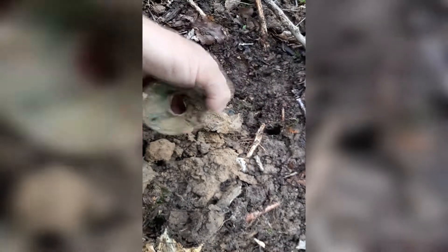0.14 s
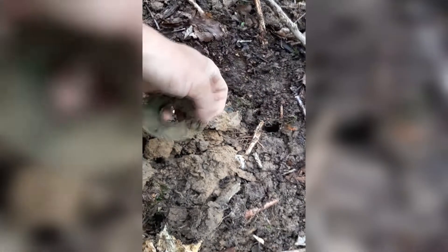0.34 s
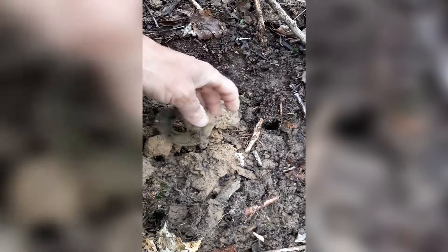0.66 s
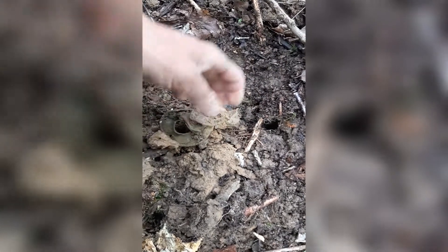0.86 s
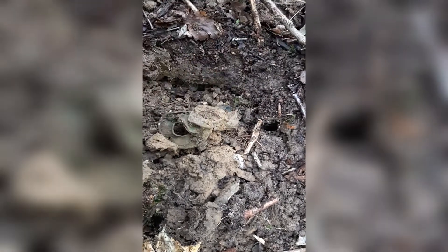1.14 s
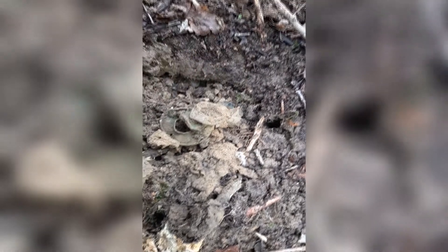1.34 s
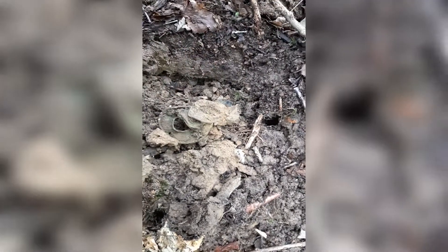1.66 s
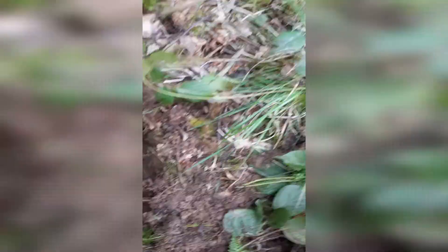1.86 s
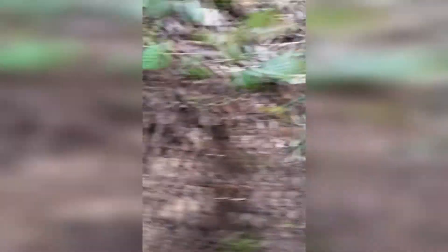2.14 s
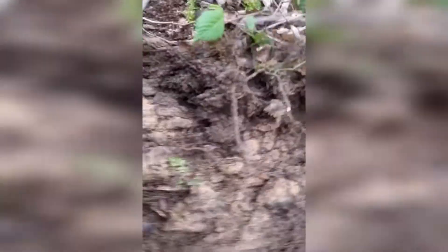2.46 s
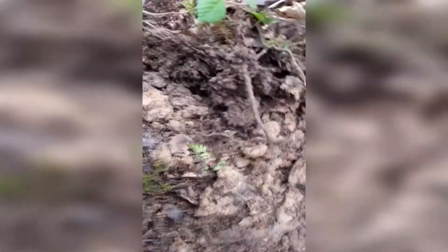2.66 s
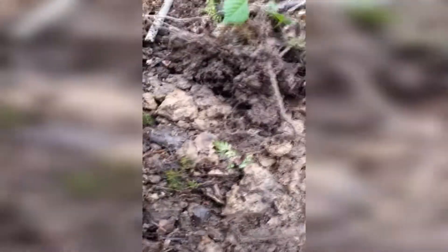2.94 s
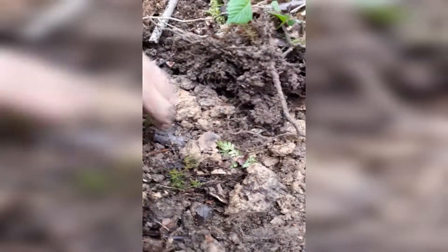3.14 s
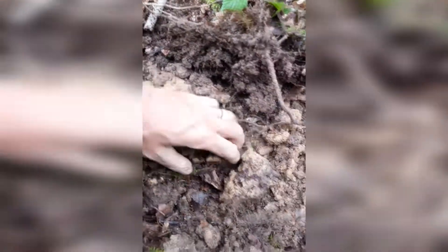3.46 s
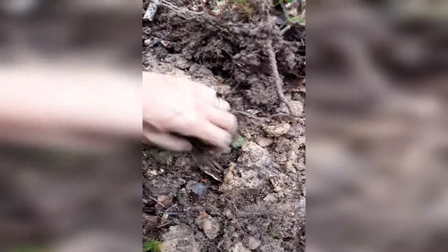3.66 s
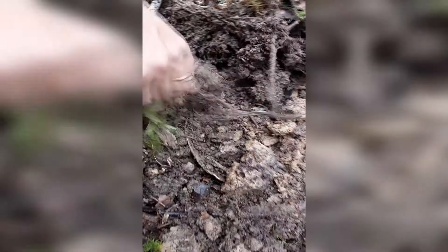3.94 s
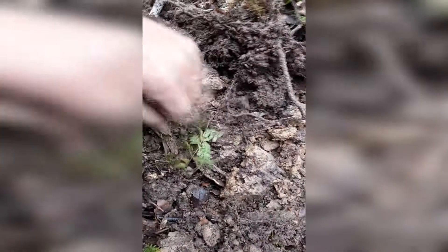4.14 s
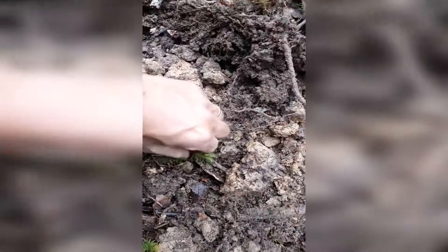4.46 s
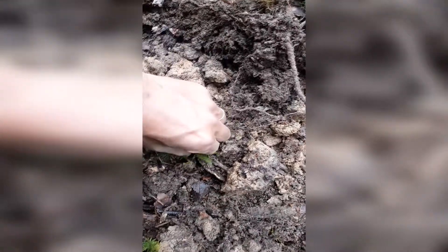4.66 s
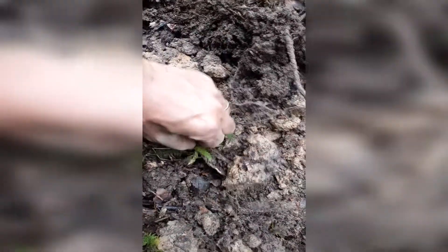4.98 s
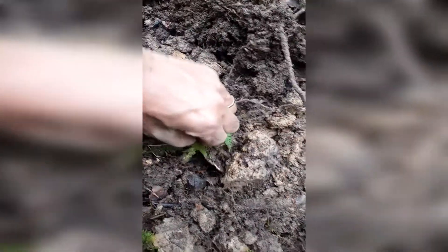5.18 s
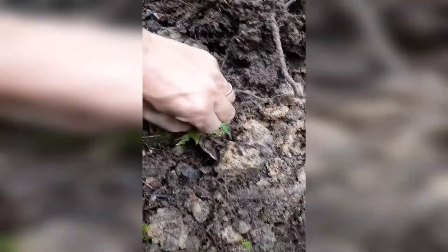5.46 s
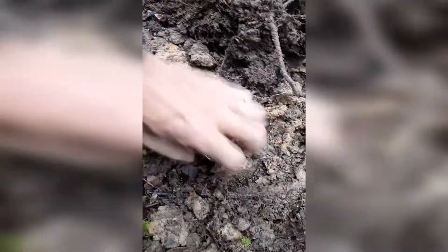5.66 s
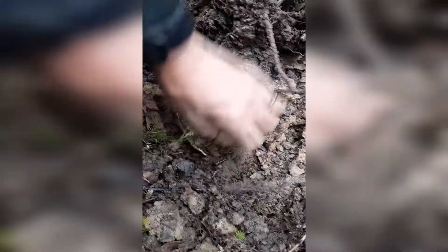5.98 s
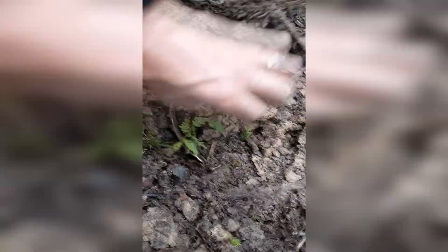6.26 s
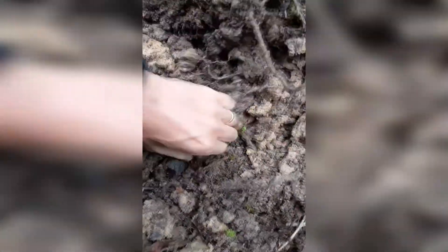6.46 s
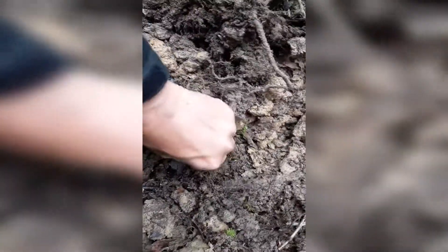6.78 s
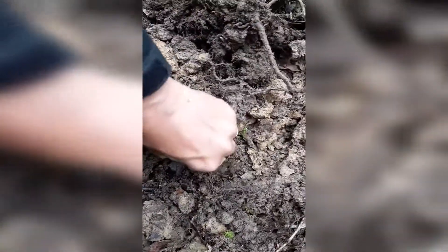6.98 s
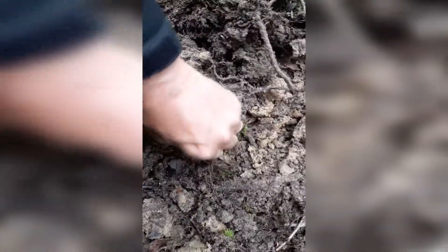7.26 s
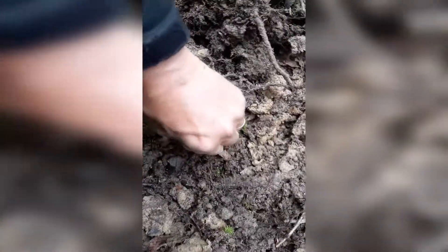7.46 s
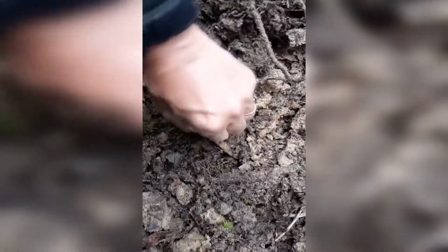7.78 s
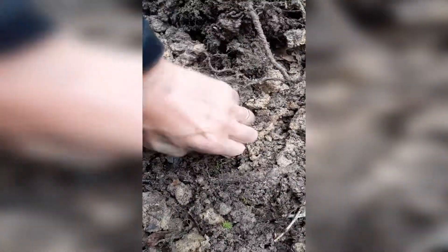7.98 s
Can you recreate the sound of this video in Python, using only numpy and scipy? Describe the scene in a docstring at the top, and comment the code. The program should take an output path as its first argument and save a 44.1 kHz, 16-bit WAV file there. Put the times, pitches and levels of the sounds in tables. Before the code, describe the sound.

Close, crisp handling of forest soil, mostly towards the left. Quiet dry crumbling grows gradually, then abruptly becomes fuller grinding of clods, rustling litter and hissing dirt, punctuated by snaps and dull knocks. Midway the hand almost stops and a distant bird trills with woodland echo; a shorter bout of scraping follows, then small fading scratches. Soft outdoor rumble and hiss remain throughout.

```python
"""A hand digs in loose forest soil close to a phone: first in dry crumbs, where early snaps and thuds are heard
and a small bird further off in the trees begins to whistle; then, after a cut, in damper earth and leaf litter.
Each stroke drives showers of tiny random clicks, filtered into grinding clods, rustling litter and hissing dirt.
Twigs and thuds are damped resonances; the bird's whistles and later trills are gliding sines with wood echoes.
Throughout lies the faint rumble and hiss of the open air, made of filtered noise."""
import sys
import numpy as np
from scipy import signal
from scipy.fft import rfft, irfft
from scipy.io import wavfile

SR = 44100
rng = np.random.default_rng(int(sys.argv[2]) if len(sys.argv) > 2 else 0)


def log_audio(samples):
    """Write samples as a 16-bit WAV file to the path given in sys.argv[1]."""
    # one column per channel
    frames = np.atleast_2d(samples).T
    # limit to full scale, then quantise
    limited = np.clip(frames, -1, 1)
    pcm = np.round(limited * 32767).astype(np.int16)
    wavfile.write(sys.argv[1], SR, pcm)


N = 358085
T = np.arange(N) / SR
FREQS = np.fft.rfftfreq(N, 1 / SR) + 1e-3  # Hz; the offset avoids zero in logarithms and ratios
CUT_S = 1.853  # the dry patch gives way to the damp one


def undb(db):
    """Logarithmic level: decibels to amplitude gain."""
    return 10 ** (np.asarray(db) / 20)


def sides(pan_db):
    """Interaural level difference: left and right gains for left minus right in dB."""
    return undb(np.array([[.5], [-.5]]) * pan_db)


def colour(points):
    """Spectral envelope: gain over frequency for each dB column, interpolated over log frequency."""
    hz, *columns = np.transpose(points)
    return np.array([undb(np.interp(np.log(FREQS), np.log(hz), column)) for column in columns])


def shaped(x, gain, band):
    """Linear filtering: colour a stereo pair so that its middle has rms 1 within a band in Hz."""
    spectrum = rfft(x) * gain
    inside = (FREQS > band[0]) & (FREQS < band[1])
    middle = irfft(spectrum.mean(0) * inside, N)
    return irfft(spectrum, N) / np.std(middle)


def walk(rate):
    """Slow random modulation: a wander of spread near 1 through `rate` random knots a second."""
    knots = rng.standard_normal(8192)
    return 1.1 * np.interp(T * rate, np.arange(len(knots)), knots)


# Strokes of the hand in the dry crumbs, then in the damp earth. Each row: start in seconds, attack in seconds,
# hold in seconds, release in seconds per 20 dB of rustle, rustle in dB, clods in dB over the rustle,
# fine dirt in dB over the rustle, left minus right in dB.
DRY_STROKES = [(0, 0.0067, 0.084, 0.5, -57, -14, -17, -16.5),
               (0.18, 0.082, 0.07, 0.3, -55.5, -14, -12.5, -18),
               (0.92, 0.18, 0.057, 0.12, -50.5, -13.5, -9, -13.5),
               (1.05, 0.19, 0.077, 0.55, -49, -9.5, -1, -5.5),
               (1.22, 0.15, 0.098, 0.26, -47, -10.5, -7, -6)]
DAMP_STROKES = [(1.78, 0.08, 0.08, 0.39, -43.5, -9.5, -4, -11.5),
                (1.92, 0.07, 0.037, 0.46, -42.5, -6.5, -7.5, -13),
                (2.08, 0.1, 0.13, 0.32, -41, -9.5, -5.5, -14),
                (2.22, 0.14, 0.11, 0.51, -43, -8.5, -3, -11.5), (2.47, 0.1, 0.19, 1, -45, -12.5, -6, -15.5),
                (2.75, 0.11, 0.31, 0.3, -49.5, -8.5, 0.5, -5),
                (3.02, 0.26, 0.099, 0.2, -41.5, -9.5, -1.5, -11),
                (3.24, 0.1, 0.13, 0.095, -44.5, -7.5, -3, -16),
                (3.53, 0.31, 0.057, 0.25, -47, -9, -5.5, -12.5),
                (4.07, 0.06, 0.12, 0.37, -48, -16.5, 0.5, -11.5),
                (4.12, 0.14, 0.052, 0.31, -48, -7, -10, -16), (4.56, 0.089, 0.066, 0.36, -65, -23, -2, -24),
                (4.89, 0.15, 0.28, 0.3, -66, -18, -8.5, -16), (5.42, 0.075, 0.071, 0.19, -67, -13, -4, -16),
                (5.53, 0.19, 0.12, 0.22, -51, -12.5, -2.5, -15),
                (5.88, 0.17, 0.065, 0.18, -51.5, -10, -5, -12.5),
                (6.19, 0.11, 0.023, 0.15, -50.5, -16, -3.5, -12.5),
                (6.28, 0.08, 0.078, 0.36, -50.5, -9.5, -3.5, -13.5),
                (6.95, 0.058, 0.08, 0.22, -65.5, -19, -6.5, -14),
                (7.11, 0.093, 0.01, 0.16, -58, -19, -6, -15),
                (7.43, 0.1, 0.036, 0.1, -62.5, -17, -2.5, -14),
                (7.73, 0.086, 0.16, 0.29, -64, -20, -5.5, -14),
                (7.89, 0.17, 0.05, 0.3, -59, -18.5, -6, -15)]
# Colour of each patch at the two microphones; the right port rings near 4 kHz.
# Each row: frequency in Hz, left in dB, right in dB.
DRY_COLOUR = [(40.0, -11, -37), (110.0, -8.5, -16), (285, -15, -19.5), (550.0, -12, -21.5),
              (1030, -7.5, -16.5), (1600, -9.5, -9), (2180, -0.5, 4), (2820, -7.5, 2), (4730, 3, -5.5),
              (5470, -2.5, -1.5), (6340, 2, -15), (7150, -12.5, -31), (9100, -12.5, -21),
              (15500.0, -14, -21)]
DAMP_COLOUR = [(40.0, -42, -39), (131, -23.5, -21.5), (252, -25.5, -34), (833, -16.5, -16.5),
               (1150, -19.5, -20.5), (1690, -17, -19), (2330, -21, -8.5), (3057, -17.5, -5.5),
               (4130, -12.5, 4), (4790, -20, -4.5), (5800, -10, -4), (7410, -26, -29), (11000, -24, -23),
               (11800, -25.5, -24), (13350, -26, -17)]
# edges of the grinding, rustling and hissing ranges, and the band in which each level is given (Hz)
SPLITS = (1700, 7200)
GRIND_BAND, RUSTLE_BAND, HISS_BAND = (350, 1600), (2000, 3600), (8500, 15500)
# bass of the hand's weight: level (dB) when the clods reach FIRM_GRIND_DB, and its slope (dB per dB of clods)
WEIGHT_DB, WEIGHT_SLOPE, FIRM_GRIND_DB = -66.5, 0.58, -55
# a light touch stirs mostly the small flakes: dB of gain for each dB of rustle under MIDDLING_RUSTLE_DB
DRY_LIGHT_TOUCH, DAMP_LIGHT_TOUCH, MIDDLING_RUSTLE_DB = .08, .2, -52


def digging(strokes, tone, light_touch, grind_db, rustle_db, hiss_db, press_db):
    """Stick-slip friction: the hand catches and slips, and grains of three sizes follow its strokes."""
    rustle, grind, hiss, pan = stroke_levels(strokes)
    press = WEIGHT_DB + WEIGHT_SLOPE * (grind - FIRM_GRIND_DB)
    gain = colour(tone)
    below_rustle, below_hiss = (1 / (1 + (FREQS / hz) ** 16) for hz in SPLITS)  # shares of power
    deep = 1 / (1 + (FREQS / 260) ** 4)
    slip_db = 0.89 * walk(45) + .5 * walk(220)  # shared by all grain sizes

    clods = shaped(fractures(4000, 2.0, 0.52), gain * np.sqrt(below_rustle * (1 - deep)), GRIND_BAND)
    clods = off_hand(clods, .4, .0018)
    clods = clods * undb(grind + grind_db + 0.77 * walk(60))

    # weight on the ground gives a bass mostly common to both sides
    weight = shaped(fractures(700, 3.0, 0.75), gain * np.sqrt(below_rustle * deep), (0, SPLITS[0]))
    weight = weight * undb(press + press_db + 2.7 * walk(25))

    small_db = light_touch * (MIDDLING_RUSTLE_DB - rustle)
    litter = crackle(gain * np.sqrt((1 - below_rustle) * below_hiss), pan, small_db)
    litter = litter * undb(rustle + rustle_db)

    # the finest dirt trickles
    dust = shaped(fractures(14000, 3.2, 0.046), gain * np.sqrt(1 - below_hiss), HISS_BAND)
    dust = dust * undb(hiss + hiss_db)
    return (clods + weight + litter + dust) * undb(slip_db)


# clods and fine dirt grow with these powers of a stroke's force
CLOD_POWER, DIRT_POWER = 1.45, 1.13
# between strokes the loosened soil keeps settling: levels (dB) and left minus right (dB)
SETTLE_RUSTLE_DB, SETTLE_CLODS_DB, SETTLE_DIRT_DB, SETTLE_PAN_DB = -69, -87.5, -80, -21.5


def stroke_levels(strokes):
    """Energy addition: strokes swell, hold and decay, and their powers sum to dB of each grain and a side."""
    settling = (SETTLE_RUSTLE_DB, SETTLE_CLODS_DB, SETTLE_DIRT_DB)
    rustle, clods, dirt = (np.full(N, undb(db) ** 2) for db in settling)
    side = rustle * SETTLE_PAN_DB
    for s, attack, hold, release, db, clods_db, dirt_db, pan_db in strokes:
        swell = np.sin(np.pi / 2 * np.clip((T - s) / attack, 0, 1)) ** 2
        force = swell * undb(-20 * np.maximum(T - s - attack - hold, 0) / release)
        power = (force * undb(db)) ** 2
        rustle = rustle + power
        side = side + power * pan_db
        clods = clods + (force ** CLOD_POWER * undb(db + clods_db)) ** 2
        dirt = dirt + (force ** DIRT_POWER * undb(db + dirt_db)) ** 2
    rustle_db, clods_db, dirt_db = 10 * np.log10([rustle, clods, dirt])
    return rustle_db, clods_db, dirt_db, side / rustle


def crackle(gain, pan_db, small_db):
    """Independent modulation: large and small flakes surge on their own, placed by the hand's side."""
    spectrum = rfft(fractures(8000, 2.5, 0.34)) * gain
    inside = (FREQS > RUSTLE_BAND[0]) & (FREQS < RUSTLE_BAND[1])
    spectrum /= np.std(irfft(spectrum * inside, N), axis=1, keepdims=True)
    small = 1 / (1 + (4300 / FREQS) ** 8)  # share of the small, bright flakes
    large_flakes = irfft(spectrum * (1 - small), N) * undb(0.85 * walk(30))
    small_flakes = irfft(spectrum * small, N) * undb(small_db + 1.67 * walk(30))
    place = sides(pan_db)
    return off_hand(large_flakes + small_flakes, .2, .0008) * 2 * place / np.hypot(*place)


def off_hand(x, echo, delay_s):
    """Comb filtering: the moving hand throws back a near echo, so hollow patches drift slowly."""
    path = delay_s * np.exp(.25 * walk(2.5))
    back = np.array([np.interp(T - path, T, channel) for channel in x])
    return (x + echo * back) / np.hypot(1, echo)


# Phase by which the left port leads the right for sound from the ground.
# Each row: frequency in Hz, lead in radians.
PORT_PHASE = [(100, 0.5), (750, -0.86), (1400, -1.5), (2100, -5.5), (3800, -4.5), (16000, -19)]


def fractures(rate, spread_db, shared):
    """Shot noise: `rate` random clicks a second, most small and a few large; a share reaches both sides."""
    size = undb(spread_db * np.minimum(rng.exponential(size=(3, N)), 5))
    clicks = (rng.random((3, N)) < rate / SR) * size * rng.choice([-1, 1], (3, N))
    clicks /= clicks.std(axis=1, keepdims=True)
    own, common = clicks[:2], clicks[2]
    lead = np.interp(FREQS, *np.transpose(PORT_PHASE))
    left = irfft(rfft(common) * np.exp(1j * lead), N)
    shared = np.clip(shared, 0, 1)
    return np.sqrt(shared) * np.array([left, common]) + np.sqrt(1 - shared) * own


# Twigs and crumbs that snap, then clods and fingers that strike the ground. Each row: start in seconds,
# level in dB, ring frequency in Hz, resonance width in Hz, left minus right in dB.
SNAPS = [(.272, -31, 3020, 2200, 1), (1.0865, -31, 2570, 1000, 4), (1.789, -34.5, 3040, 980, -20),
         (2.136, -24, 2380, 1980, -13), (2.1585, -20.5, 3930, 2400, -17), (2.2145, -32, 4130, 2400, -14),
         (3.256, -21, 4280, 2000, -12), (3.346, -28, 3920, 1600, -11), (4.0465, -36, 3880, 1830, -20),
         (5.357, -42, 3700, 2530, -15), (5.8364, -22.5, 3966, 1480, -22), (6.0358, -24, 2600, 1270, -13.5),
         (7.2045, -39, 4430, 2380, -15)]
THUDS = [(.2715, -50, 687, 900, 13), (.272, -48.5, 159, 130, 7), (1.231, -47.5, 89.5, 80, 24),
         (1.244, -44, 117, 80.4, 26), (1.789, -52, 118, 120, -16), (2.04, -50, 140, 110, -3),
         (2.208, -50, 95, 80, -4), (3.347, -27.5, 706, 700, 2), (3.348, -36.5, 150, 100, 2.5),
         (3.772, -47, 148, 110, 0), (3.826, -41.5, 150.4, 110, 2), (3.925, -48, 139, 109, 3),
         (5.68, -55, 151.7, 100, 0), (5.8, -49, 150, 101, 2), (5.852, -38, 810, 1002, 9),
         (6.0355, -41, 1050, 895, 1), (6.13, -57, 171, 110, 6)]


def blows(table, crumble_db, crumble_s, muffle_hz):
    """Damped resonance: each blow rings once, crumbs settle just after and the top is dulled."""
    out, t = np.zeros((2, N)), T[:4096]
    for s, db, hz, width, pan in table:
        swell = np.pi * width * t
        ring = swell * np.exp(1 - swell) * np.sin(2 * np.pi * hz * t)
        grains = rng.standard_normal(len(t)) * np.exp(-t / crumble_s)
        crumbs = np.convolve(grains, ring)[:len(t)]
        crumbs /= np.abs(crumbs).max()
        start = int(s * SR)
        out[:, start:start + len(t)] += sides(pan) * undb(db) * (ring + undb(crumble_db) * crumbs)
    return signal.sosfilt(signal.butter(6, muffle_hz, fs=SR, output="sos"), out)


def bird(direct_db, wood_db, wood_t60, pan_db):
    """Frequency glides and reverberation: whistles smeared by decaying echoes from the trunks."""
    song = np.zeros(N)
    waver = 1 + .005 * walk(250)
    for s, length, *pitch, db in notes():
        u = np.linspace(0, 1, int(length * SR))
        hz = np.interp(u, [0, .5, 1], pitch) * waver[:len(u)]
        envelope = np.sqrt(np.abs(np.sin(np.pi * u)))
        tone = np.sin(2 * np.pi * np.cumsum(hz) / SR)
        start = int(s * SR)
        song[start:start + len(u)] += undb(db) * envelope * tone
    t = T[:SR]
    trunks = rng.standard_normal((2, SR)) * undb(-60 * t / wood_t60) * (1 - np.exp(-t / 0.0052))
    trunks /= np.linalg.norm(trunks, axis=1, keepdims=True)
    echoes = signal.fftconvolve(song[None], trunks, axes=1)[:, :N]
    return sides(pan_db) * (undb(direct_db) * song + undb(wood_db) * echoes)


# Single whistles of the bird. Each row: start in seconds, length in seconds, start pitch in Hz,
# middle pitch in Hz, end pitch in Hz, relative level in dB.
WHISTLES = [(.868, 0.03, 4040, 3800, 3700, -60), (.998, 0.031, 3960, 3470, 3250, -49),
            (1.056, 0.045, 3100, 2650, 2150, -49.5), (3.42, .075, 4020, 3444, 3210, -43),
            (4.557, 0.0855, 5330, 5060, 4980, -52.5), (5.33, 0.16, 7570, 7100, 7160, -75),
            (7.41, .15, 3415, 3340, 3310, -58.5)]
# Trills that repeat one gliding note at an even pace. Each row: start in seconds, period in seconds,
# note length in seconds, start pitch in Hz, middle pitch in Hz, end pitch in Hz, relative level in dB.
TRILLS = [(4.708, .108, .042, 4100, 4250, 5280, -50.3), (6.637, .194, .036, 5950, 4550, 3894, -48.8)]
# Number of notes in each trill: one count for each row above.
TRILL_NOTES = (6, 4)
# spread from note to note in a trill: pitch (share) and level (dB)
NOTE_PITCH_SPREAD, NOTE_SPREAD_DB = 0.01375, 0.8


def notes():
    """Periodic repetition with random variation: single whistles, and trills note by note."""
    sung = list(WHISTLES)
    for (s, period, length, *pitch, db), count in zip(TRILLS, TRILL_NOTES):
        for k, (higher, louder) in enumerate(rng.standard_normal((int(count), 2))):
            hz = np.array(pitch) * (1 + NOTE_PITCH_SPREAD * higher)
            sung.append((s + k * period, length, *hz, db + NOTE_SPREAD_DB * louder))
    return sung


# Spectrum of the open air. Each row: frequency in Hz, relative level in dB.
AIR = [(25, -6), (55, -0.5), (90, 4), (150, -1), (250, -13.5), (500, -18.5), (1500, -20), (4000, -44),
       (7500, -23.5), (15500, -20)]
AIR_DB = -69.5  # level about which the air wanders


def air():
    """Partly coherent noise: faint outdoor rumble and hiss whose bass is alike on both sides."""
    noise = rfft(rng.standard_normal((3, N)))
    alike = 1 / (1 + (FREQS / 500) ** 2)
    mixed = np.sqrt(alike) * noise[2] + np.sqrt(1 - alike) * noise[:2]
    x = irfft(mixed * colour(AIR), N)
    return x / x.std() * undb(AIR_DB + 0.25 * walk(3.7))


def scene():
    """Superposition: dry patch, cut, damp patch, with snaps, thuds, bird and air added over both."""
    first = digging(DRY_STROKES, DRY_COLOUR, DRY_LIGHT_TOUCH,
                    grind_db=0.5, rustle_db=0.5, hiss_db=0.0, press_db=-1.5)
    second = digging(DAMP_STROKES, DAMP_COLOUR, DAMP_LIGHT_TOUCH,
                     grind_db=-0.5, rustle_db=-0.5, hiss_db=-0.5, press_db=2.5)
    snaps = blows(SNAPS, crumble_db=-13, crumble_s=0.0044, muffle_hz=6200)
    thuds = blows(THUDS, crumble_db=-15, crumble_s=0.018, muffle_hz=2490)
    song = bird(direct_db=-0.5, wood_db=4.5, wood_t60=0.95, pan_db=-12.5)
    return np.where(T < CUT_S, first, second) + snaps + thuds + song + air()


def record(dry):
    """Band limiting: the deepest bass is thinned away, and the phone cuts the top steeply."""
    thin = signal.sosfilt(signal.butter(2, 50, "high", fs=SR, output="sos"), dry)
    return signal.sosfilt(signal.ellip(12, .2, 80, 15750, fs=SR, output="sos"), thin)


dry = scene()
out = record(dry)
log_audio(out)
```